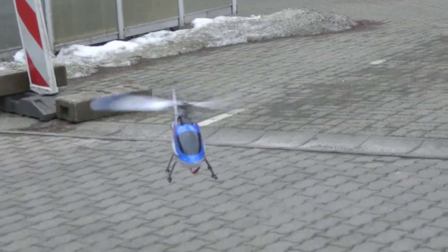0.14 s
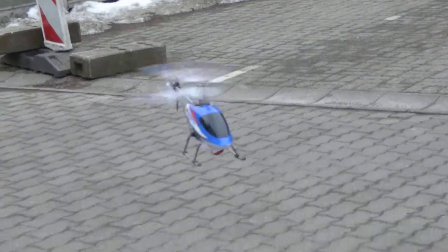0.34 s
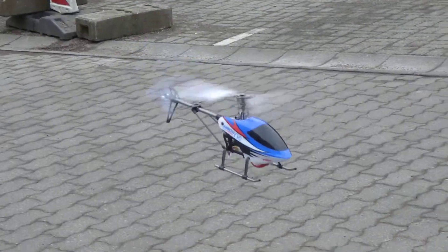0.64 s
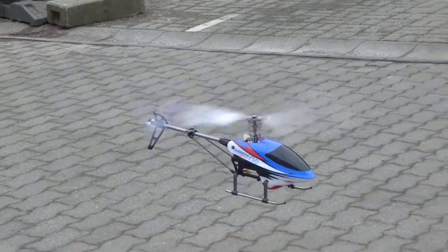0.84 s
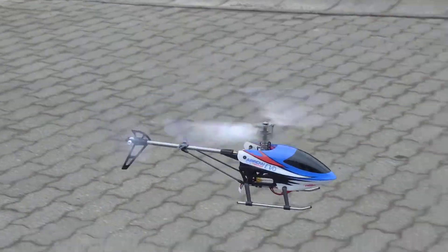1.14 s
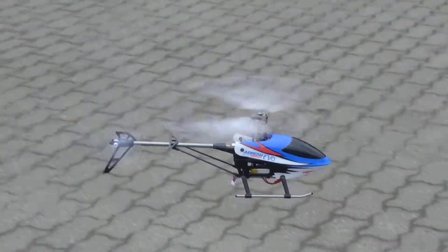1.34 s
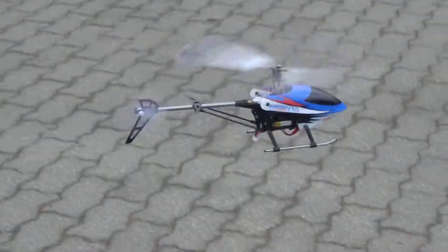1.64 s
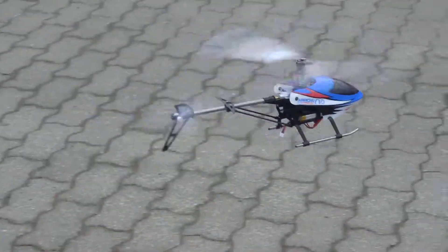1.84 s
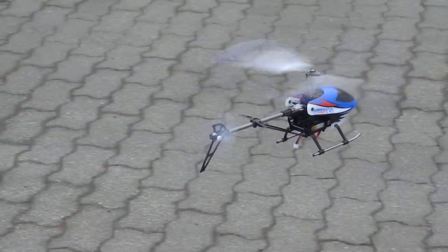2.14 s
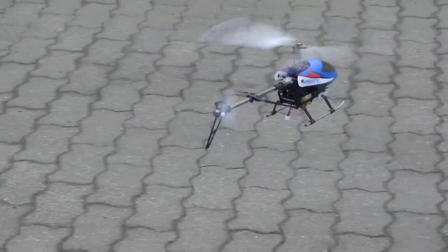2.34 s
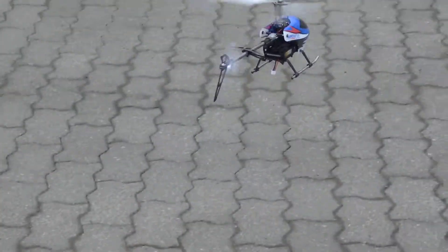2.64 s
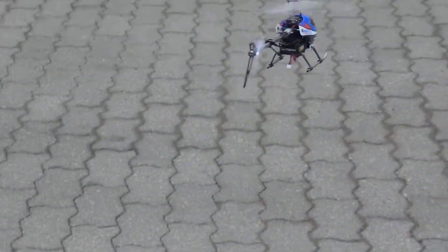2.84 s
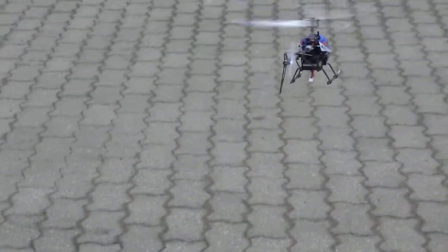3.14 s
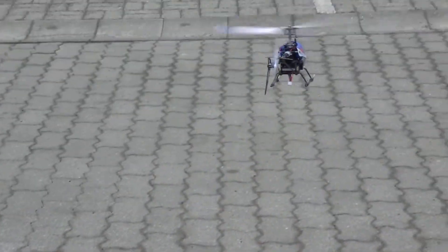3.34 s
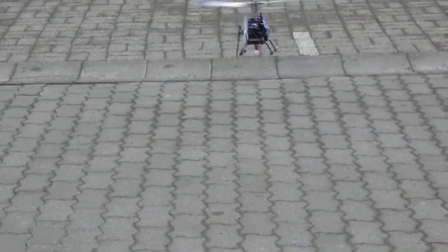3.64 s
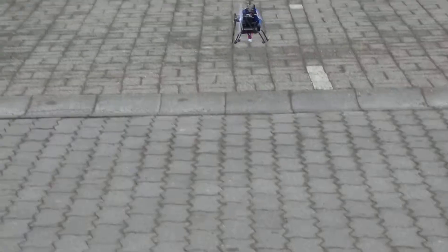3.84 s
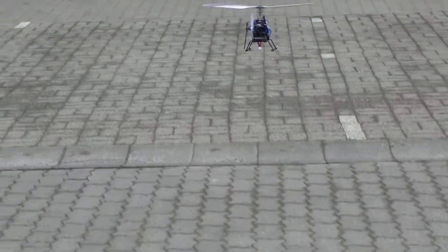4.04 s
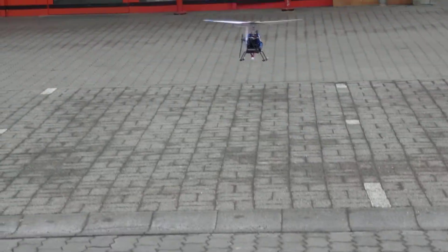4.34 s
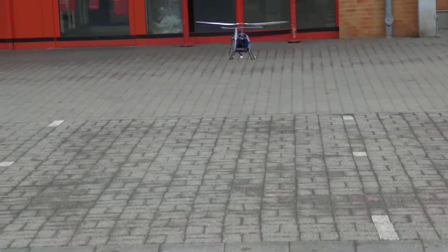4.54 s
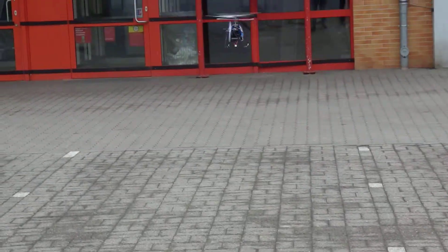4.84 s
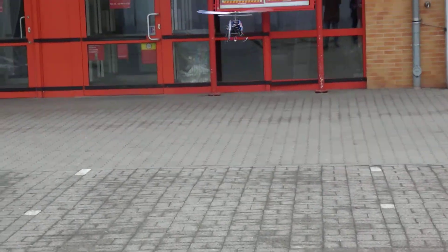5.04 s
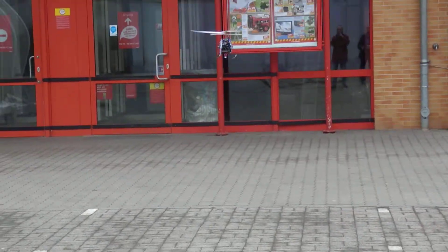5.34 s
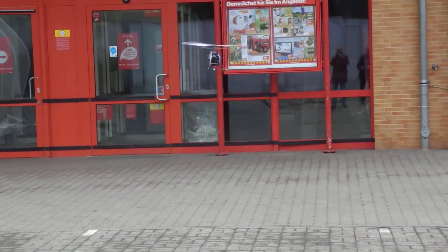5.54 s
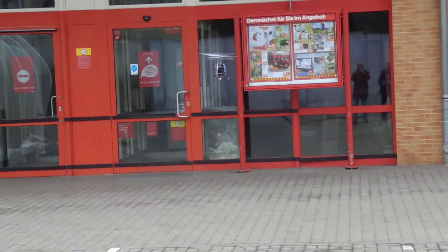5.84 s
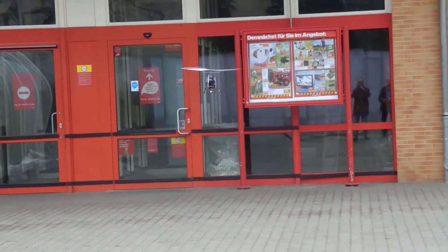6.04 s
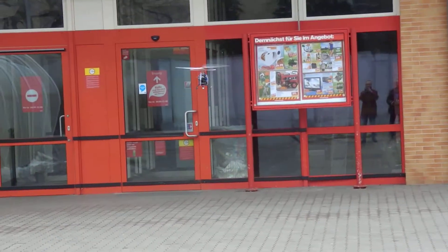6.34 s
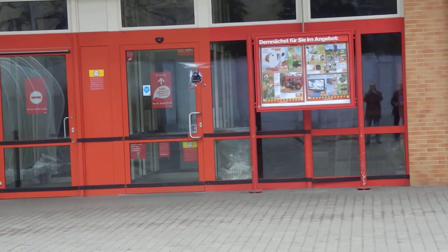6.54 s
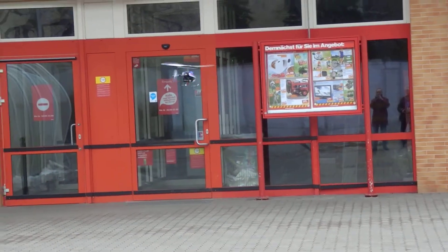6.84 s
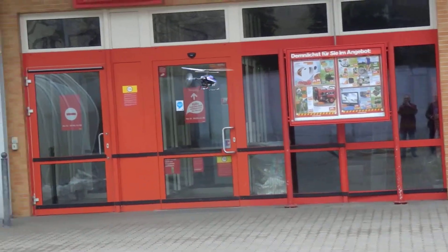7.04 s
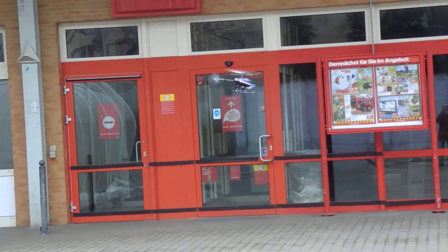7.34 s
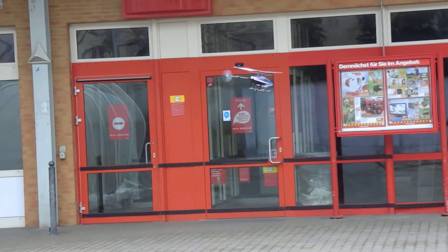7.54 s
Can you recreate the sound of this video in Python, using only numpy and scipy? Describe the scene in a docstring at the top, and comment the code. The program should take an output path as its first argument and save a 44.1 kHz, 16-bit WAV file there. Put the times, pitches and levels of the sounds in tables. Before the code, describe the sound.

A small electric model helicopter is heard from the start, a few metres away: a dense, nasal motor whine in the low thousands of hertz, crisp gear rattle above it and a rapidly fluttering airy swish. From 0 to 1.8 s it comes nearer, growing brighter and louder, the pitch creeping upward while the tail motor wavers and warbles. The close pass is at about 1.8 to 2.4 s, harsh and detailed. From 2.5 s it moves away; a short soft low puff of air brushes the microphone near 3.4 s. By 4 s rattle and swish are fading. Around 4.8 to 5.3 s the motor sags slightly in pitch, with a wall echo, and recovers by about 5.8 s. Until 7.7 s it stays a thin, distant whine in open yard reverberation, over muffled town traffic that rises slightly, with a faint low car engine hum strongest near 6.3 s.

```python
"""Model helicopter in a car park

A small electric model helicopter hovers past in a paved car park and flies off towards a shop front.
Gear-mesh partials and filtered chatter make the main motor's whine and rattle; the tail motor is a
stack of partials that hunts up and down in pitch, and the blades swish as beating coloured noise.
The paving combs the noise, the shop wall echoes the motors, and downwash puffs at the microphone.
Behind lies distant town noise, with one car whose partials follow a changing firing rate.
"""
import sys
import numpy as np
from scipy import signal
from scipy.fft import rfft, irfft, next_fast_len
from scipy.io import wavfile

SR = 44100
rng = np.random.default_rng(int(sys.argv[2]) if len(sys.argv) > 2 else 0)


def transcribe(signal):
    """Save signal, clipped to [-1, 1], as a 16-bit WAV file at the path in sys.argv[1]."""
    frames = np.atleast_2d(signal).T
    limited = np.clip(frames, -1, 1)
    pcm = np.round(limited * 32767).astype(np.int16)
    wavfile.write(sys.argv[1], SR, pcm)


N = 339129
TIME = np.arange(N) / SR  # seconds
SOUND_SPEED = 343  # metres a second
TEETH, GEAR_RATIO = 8, 8.25  # pinion teeth; shaft turns to one turn of the main rotor

# Path of the helicopter. Each row: time in seconds, distance in metres, height in metres,
# side shown to the listener (0 nose, 1 flank, 2 tail).
FLIGHT = [(0, 4.27, 1.21, 0.16), (.9, 2.49, 0.59, 0.04), (1.8, 1.86, 0.26, 0.79), (2.4, 1.98, 0.24, 1.1),
          (3, 2.9, .38, 0.88), (4, 4.92, 0.8, 1.4), (4.8, 7.9, 1.44, 1.58), (5.6, 10, 1.83, 1.76),
          (6.6, 10.6, 1.66, 1.8), (7.69, 8.5, 1.48, 1.44)]


def amp(db):
    """Level to amplitude: twenty decibels are a factor of ten."""
    return 10 ** (np.asarray(db) / 20)


def unit(x):
    """Normalization: scales a signal to rms 1."""
    return x / np.sqrt(np.mean(abs(x) ** 2) + 1e-20)


def curves(table):
    """Linear interpolation: the columns of a table as curves in time."""
    seconds, *columns = np.transpose(table)
    return [np.interp(TIME, seconds, column) for column in columns]


def colours(table, hz):
    """Spectral interpolation: the columns of a table as curves on a log-frequency axis."""
    table_hz, *columns = np.transpose(table)
    return [np.interp(np.log(hz + 1), np.log(table_hz + 1), column) for column in columns]


def shaped(x, gain):
    """Linear filtering: multiplies the spectrum of x by a function of frequency."""
    size = next_fast_len(N + 4096)
    spectrum = rfft(x, size) * gain(np.fft.rfftfreq(size, 1 / SR))
    return irfft(spectrum, size)[..., :N]


def noise(table, column=0):
    """Coloured noise: white noise filtered by one column of a table, at rms 1."""
    return unit(shaped(rng.standard_normal(N), lambda hz: amp(colours(table, hz)[column])))


def rumble(centre_hz, width_hz):
    """Narrow-band noise: random motion about one frequency, at rms 1."""
    def band(hz):
        return 1 / (1 + ((hz - centre_hz) / width_hz) ** 4)
    return unit(shaped(rng.standard_normal(N), band))


def drift(rate_hz):
    """Low-pass random process: slow chance of rms 1, mostly below the given rate."""
    size = 4096  # coarse points over the whole duration
    hz = np.fft.rfftfreq(size, N / SR / size)
    slow = irfft(rfft(rng.standard_normal(size)) / np.sqrt(1 + (hz / rate_hz) ** 4))
    return np.interp(TIME, np.linspace(0, N / SR, size), unit(slow))


def tone(turns, flutter, flutter_hz):
    """Random modulation: a partial of rms 1 whose strength and phase flutter."""
    wave = np.cos(2 * np.pi * (turns + rng.random()) + flutter * drift(flutter_hz))
    return unit(wave * np.exp(flutter * drift(flutter_hz)))


def delayed(x, seconds):
    """Propagation delay: x heard late, with a pitch shift wherever the delay changes."""
    return np.interp(TIME - seconds, TIME, x)


def spread(common, apart, width):
    """Sum and difference: two channels share one sound and carry another in opposite phase."""
    return np.array([common + width * apart, common - width * apart]) / np.sqrt(1 + width ** 2)


def facing():
    """Source directivity: the shares of nose, flank and tail turned to the listener."""
    side = np.clip(curves(FLIGHT)[2], 0, 2)
    return np.array([np.maximum(1 - abs(side - k), 0) for k in np.arange(3)])


def town(rumble_hz=55, rumble_width_hz=22, wide_hz=2500):
    """Incoherent summation: far traffic wash, a swelling rumble and a car's harmonic firing tones."""
    # Each row: time in seconds, level of the wash in dB.
    wash_level = [(0, -42), (2, -41), (4, -38.5), (5.5, -38), (6.3, -34.5), (7, -35.5), (7.69, -36)]
    # Colour of the wash. Each row: frequency in Hz, gain in dB.
    wash_colour = [(15, -22), (30, -18), (55, -3), (85, -7.5), (130, -0.5), (180, -4.5), (250, 4),
                   (340, -1.5), (450, 1), (700, 1.5), (1200, -4), (2500, -14.5), (6000, -48), (16000, -75)]
    # Distant car. Each row: time in seconds, firing rate in Hz, level in dB.
    car_course = [(0, 90, -54), (1.8, 84.1, -55), (3, 96, -50.5), (3.7, 81, -49.5), (4.8, 84, -47),
                  (5.9, 110.8, -51), (6.25, 122, -43.5), (6.8, 129.8, -48), (7.69, 97.2, -51)]
    # Each row: multiple of the firing rate, gain in dB.
    car_partials = [(1, -2.5), (2, -9), (3, -15)]
    # Each row: time in seconds, level of the rumble in dB.
    rumble_level = [(0, -59), (1.5, -58), (3, -53), (4.5, -53), (6.3, -59), (7.69, -57)]

    apart = shaped(noise(wash_colour), lambda hz: hz / (hz + wide_hz))  # nearly mono in the bass
    wash_db = curves(wash_level)[0] + .5 * drift(5)
    wash = amp(wash_db) * (noise(wash_colour) + np.array([apart, -apart]))
    firing_hz, car_db = curves(car_course)
    turns = np.cumsum(firing_hz) / SR
    partials = [amp(db) * tone(k * turns, flutter=0.27, flutter_hz=3.4) for k, db in car_partials]
    car = amp(car_db) * sum(partials)
    return wash + car + amp(curves(rumble_level)[0]) * rumble(rumble_hz, rumble_width_hz)


def downwash(centre_hz=45, width_hz=18):
    """Wind-induced pressure: moving air puffs at the microphone as short bursts of low noise."""
    # Each row: centre in seconds, peak gain in dB, time from the peak to 1/e in seconds.
    puffs = [(2.52, -50, .09), (3.445, -41, 0.0518)]
    envelope = sum(amp(db) * np.exp(-((TIME - s) / length) ** 2) for s, db, length in puffs)
    return rumble(centre_hz, width_hz) * envelope


def car_park(x, wall_db, yard_db, wall_m=18, t60=0.72):
    """Image source and diffuse decay: wall echo and yard scatter weigh more with distance."""
    # Beaming of the helicopter towards the wall. Each row: time in seconds, added echo gain in dB.
    beam = [(0, -6), (4.7, -5), (5.05, 5), (5.4, 5), (5.7, -2), (6.1, -10), (7.69, -10)]
    metres = curves(FLIGHT)[0]
    path = 2 * wall_m - metres  # shortens as the helicopter flies off, which raises the echo's pitch
    late = (path - metres) / SOUND_SPEED
    echo = amp(wall_db + curves(beam)[0]) * metres / path * delayed(x, late)

    t = TIME[:SR]
    sparse = (rng.random((2, SR)) < .05) * (t > .01)
    taps = rng.standard_normal((2, SR)) * sparse
    taps *= np.exp(-np.log(1000) * t / t60)  # 60 dB down after t60 seconds
    taps /= np.linalg.norm(taps, axis=1, keepdims=True)
    sent = x * metres / metres.max()
    scatter = signal.fftconvolve(sent[None], taps, axes=1)[:, :N]
    return x + echo + amp(yard_db) * spread(*scatter, width=0.79)


def paving(x, reflect=0.38, rough_hz=4500, mic_height_m=1.608):
    """Comb filtering: a treble-poor ground bounce interferes, sweeping with distance and height."""
    metres, height, _ = curves(FLIGHT)
    bounce_path = np.sqrt(metres ** 2 + 4 * height * mic_height_m)
    lag = (bounce_path - metres) / SOUND_SPEED
    bounce = shaped(x.mean(0), lambda hz: 1 / (1 + (hz / rough_hz) ** 4))
    return x + reflect * delayed(bounce, lag)


def microphone_pair(x):
    """Interchannel difference: two ports hear the sound with unlike level and phase."""
    # Each row: frequency in Hz, left level minus right in dB.
    level_difference = [(60, 7), (300, -2.5), (800, -0.5), (1200, 1), (1800, 2), (2300, -1), (3000, -3),
                        (4500, 0.5), (5200, 6.5), (6100, 6), (7000, 5.5), (8500, -1.5), (15000, 1.5)]
    # Each row: frequency in Hz, phase by which left leads in radians.
    phase_lead = [(0, 0), (250, -0.2), (690, -0.55), (1030, 0.8), (2330, -0.32), (3700, 0.5), (4820, 0.87),
                  (5250, 0.53), (5940, 0.24), (7410, -0.75), (9560, -0.44), (13300, 0.0), (13800, -0.7),
                  (14600, 0.0), (15400, -0.1)]

    def ports(hz):
        """Half of the difference goes to each port, with opposite sign."""
        half_level = amp(colours(level_difference, hz)[0] / 2)
        half = half_level * np.exp(.5j * colours(phase_lead, hz)[0])
        return np.array([half, 1 / half])
    return shaped(x, ports)


def blade_swish(shaft, chop=0.19):
    """Aerodynamic noise: turbulence swells as each of two main blades comes round."""
    # Each row: time in seconds, level in dB.
    swish_level = [(0, -31.5), (.6, -30), (1.2, -30.5), (1.7, -30), (2.2, -30), (3, -33.5), (4, -33),
                   (5, -35), (6, -37.5), (7.69, -37.5)]
    # Colour of the torn air. Each row: frequency in Hz, gain in dB from nose or flank, from behind.
    swish_colour = [(100, -21, -15), (250, -16.5, -18), (450, -3, -7), (750, 1, -1), (1090, 1, -1),
                    (1660, -0.5, -4.5), (2290, 3.5, 3.5), (3260, -0.5, -7), (4000, -5.5, -5.5),
                    (9000, -26.5, -27.5)]
    beat = 1 + chop * np.cos(2 * np.pi * 2 * shaft / GEAR_RATIO)
    behind = facing()[2]
    air = np.sqrt(1 - behind) * noise(swish_colour)
    air += np.sqrt(behind) * noise(swish_colour, column=1)
    return amp(curves(swish_level)[0]) * beat * air


def tail_rotor(tail_db=-2.5, buzz_db=-11, buzz_hz=2030, buzz_width_hz=170):
    """Frequency modulation: the gyro's hunting, drawn by chance, warbles the partials; a buzz rings the boom."""
    # Tail motor, which swings as the helicopter turns and dips with the main motor.
    # Each row: time in seconds, mean blade rate in Hz.
    blade_rate = [(0, 219), (.55, 219), (.71, 227), (.78, 211), (.85, 224), (1.15, 214), (1.3, 216),
                  (1.38, 206), (1.435, 232), (1.52, 201), (1.61, 225), (1.7, 219), (1.8, 231), (2, 227),
                  (2.06, 243), (2.18, 221), (2.25, 239), (2.45, 234), (3.45, 240), (3.75, 233), (4.07, 238),
                  (4.76, 229), (4.93, 202), (5.02, 217), (5.8, 235), (7.69, 236)]
    # Each row: multiple of the blade rate, gain in dB seen from nose, flank and tail.
    whine_partials = [(1, -23, -24.5, -27), (2, -17, -19, -20), (4, -15, -17, -16), (5, -17, -17.5, -18),
                      (7, -9.5, -20, -17), (8, -22, -9, -5.5), (9, 1, 1.5, -4.5), (10, -10, -18, -14),
                      (12, -33, -29, -31), (18, -28, -7.5, -19), (27, -18, -26, -22), (29, -11, -10, -13)]
    # Each row: time in seconds, level of whine and buzz in dB before tail_db is added.
    whine_level = [(0.0, -31.5), (0.58, -35), (0.92, -25.5), (1.14, -30.5), (1.28, -24), (1.76, -31.5),
                   (2.48, -26), (3.06, -33.5), (3.85, -29), (5.93, -37.5), (7.65, -36), (7.69, -35)]
    # Each row: time in seconds, level in dB of the hum at three times the blade rate.
    hum_level = [(0, -41), (1.2, -33.5), (1.5, -41), (2.3, -48.5), (3.3, -39), (4.5, -50), (7.69, -48)]

    sides = facing()
    # less random hunting is added while the nose shows, where blade_rate already carries the quick swings
    hunting_share = 1 - .5 * sides[0]
    hunting = .01 * hunting_share * rumble(centre_hz=7, width_hz=3)  # share of the blade rate
    turns = np.cumsum(curves(blade_rate)[0] * (1 + hunting)) / SR
    whine = np.zeros(N)
    for k, *db in whine_partials:
        whine += amp(db) @ sides * tone(k * turns, flutter=.14, flutter_hz=25)
    hum = tone(3 * turns, flutter=.2, flutter_hz=20)

    def boom(hz):
        return 1 / (1 + ((hz - buzz_hz) / buzz_width_hz) ** 8)
    buzz = unit(shaped(rng.standard_normal(N), boom))
    whine_gain = amp(curves(whine_level)[0] + tail_db)
    return whine_gain * (whine + amp(buzz_db) * buzz) + amp(curves(hum_level)[0]) * hum


def gear_level(nose_db=-17.5, flank_db=-14, tail_db=-15.5):
    """Directivity and inverse distance: gear gain, from levels at one metre before each layer's trim."""
    return amp([nose_db, flank_db, tail_db]) @ facing() / curves(FLIGHT)[0]


def gear_rattle(shaft, rattle_db=-1.0, per_turn=0.21, per_half_turn=0.21, per_rotor_turn=0.15, per_blade=0.1):
    """Impact excitation: loose teeth chatter in step with shaft and rotor, and ring the frame."""
    # Colour of the rattle in frame and canopy.
    # Each row: frequency in Hz, gain in dB seen from nose, flank and tail.
    frame_colour = [(500, -54, -38, -45), (1165, -5, -11.5, -24), (1800, -16, -21, -28.5),
                    (2010, -4.5, 0.5, -8), (2660, -19, -13, -37), (3120, -9, -10, -22), (3680, -9, -13, 2),
                    (4300, -1, -2, 5), (4880, 1.5, 2.5, 6), (5480, -4, -5.5, 5.5), (5740, -4, -0.5, 4),
                    (6800, -2.5, 0, 1.5), (7910, -7.5, -13, -3.5), (9300, -18, -19.5, -14),
                    (10450, -42, -25.5, -27), (12300.0, -34.0, -35, -33), (13400, -35, -22, -21),
                    (15400, -21, -21, -14)]
    turn, rotor = 2 * np.pi * shaft, 2 * np.pi * shaft / GEAR_RATIO
    load = per_turn * np.cos(turn) + per_half_turn * np.sin(2 * turn)
    load += per_rotor_turn * np.cos(rotor) + per_blade * np.sin(2 * rotor)
    chatter = rng.standard_normal(N) * np.exp(load)
    views = shaped(chatter, lambda hz: amp(colours(frame_colour, hz)))
    heard = sum(share * unit(view) for share, view in zip(facing(), views))
    return amp(rattle_db) * gear_level() * heard


def swelling(multiple):
    """Amplitude modulation: the gain of one motor tone through its brief swells."""
    # Each row: centre in seconds, multiple of the shaft rate, peak rise in dB,
    # time from the peak to 1/e of the rise in seconds.
    swells = [(1.4, 17, 4.5, 0.23), (3.1, 17, 3.5, .5), (3.9, 18, 4.5, .5), (7.0, 23, 9, .3),
              (7.5, 21, 4, .2)]
    rises = [db * np.exp(-((TIME - s) / length) ** 2)
             for s, k, db, length in swells if abs(k - multiple) < .5]
    return amp(sum(rises))


def motor_tones(shaft, wobble=0.0041, throb=0.31, treble_db=3, mesh_db=0, octave_db=0.5, sing_db=1):
    """Gear meshing: pinion teeth strike a main gear slightly out of round, once per rotor turn."""
    # Each row: time in seconds, level in dB of the tooth-mesh tone before mesh_db is added.
    mesh_level = [(0.0, -28.5), (0.38, -22.5), (1.24, -37), (1.37, -25.5), (1.58, -35), (1.8, -22.5),
                  (2.03, -26), (2.1, -32.5), (2.55, -31.5), (3.13, -20), (3.88, -25.5), (4.56, -39.5),
                  (5.95, -36.5), (6.08, -47), (6.66, -41), (7.69, -52)]
    # Octave of the mesh tone, which swells and fades during the close pass.
    # Each row: time in seconds, level in dB before octave_db is added.
    octave_level = [(0, -35), (.73, -28), (.85, -20.5), (1.02, -30), (1.21, -22.5), (1.34, -28.5),
                    (1.48, -20), (1.63, -25.5), (1.79, -17.5), (2.02, -27), (2.4, -21), (2.85, -31),
                    (3.6, -36), (4.35, -27.5), (4.9, -28.5), (5.3, -36), (5.65, -29), (7.4, -31.5),
                    (7.69, -38)]
    # Other motor tones. Each row: multiple of the shaft rate, gain in dB seen from nose, flank
    # and tail, before treble_db is added to the highest.
    partials = [(3, -30, -28, -25), (4, -27, -31, -24), (7, -15, -17, -12), (9, -18, -16, -12),
                (10, -19, -16, -13), (11, -24, -24, -22), (12, -17, -23, -18), (13, -30, -25, -32),
                (14, -25, -25, -16), (15, -15, -16, -24), (17, -7, -8, -17), (18, -11, -10, -17),
                (19, -19, -20, -12), (20, -19, -18, -15), (21, -14, -8, -12), (22, -10, -9, -18),
                (23, -20, -20, -11), (24, -17, -12, -17), (25, -21, -21, -19), (26, -22, -24, -22),
                (27, -22, -22, -25), (28, -22, -27, -25), (29, -26, -35, -35), (32, -22, -28, -23),
                (37, -45, -42, -38), (40, -46, -43, -43), (46.88, -37, -38, -35), (48, -40, -32, -31),
                (49.12, -44, -34, -35)]

    rotor = 2 * np.pi * shaft / GEAR_RATIO
    angle = shaft + wobble * np.sin(rotor)  # shaft turns
    mesh = tone(TEETH * angle, flutter=0.05, flutter_hz=30)
    octave = tone(2 * TEETH * angle, flutter=0.035, flutter_hz=30.2)
    out = amp(curves(mesh_level)[0] + mesh_db) * mesh
    out += amp(curves(octave_level)[0] + octave_db) * octave

    sides, level = facing(), amp(sing_db) * gear_level()
    # the tones throb a quarter cycle out of step
    swings = [level * (1 + throb * np.sin(rotor + k * np.pi / 2)) for k in np.arange(4)]
    for k, (multiple, *db) in enumerate(partials):
        shrill = multiple > 33
        gain = amp(np.array(db) + treble_db * shrill) @ sides
        partial = tone(multiple * angle, flutter=0.23, flutter_hz=3.9)
        out += gain * swelling(multiple) * swings[k % len(swings)] * partial
    return out


def scene():
    """Superposition: the helicopter in the car park, over the town."""
    # Main motor shaft, which speeds up for the pass and sags once on the way out.
    # Each row: time in seconds, turns a second in Hz.
    shaft_rate = [(0, 275.6), (.3, 276.2), (.66, 281.6), (1.15, 283.6), (1.9, 285), (2.3, 286.9),
                  (2.7, 286.2), (3.12, 287.3), (3.58, 284), (3.88, 282.7), (4.15, 282), (4.42, 278.8),
                  (4.76, 276.4), (5.02, 266.3), (5.23, 263.8), (5.55, 268.8), (5.74, 274.9), (6.2, 276.8),
                  (6.75, 277.1), (7.69, 275.8)]
    shaft = np.cumsum(curves(shaft_rate)[0]) / SR  # turns
    rattle = spread(gear_rattle(shaft), gear_rattle(shaft), width=0.097)
    # the swish differs between the channels mainly above the bass
    eddies = shaped(blade_swish(shaft), lambda hz: hz / (hz + 1500))
    swish = spread(blade_swish(shaft), eddies, width=0.48)
    motor = car_park(motor_tones(shaft), wall_db=2, yard_db=-9.0)
    tail = car_park(tail_rotor(), wall_db=-2.5, yard_db=-2)
    helicopter = paving(rattle + swish) + motor + tail
    return microphone_pair(helicopter) + town() + downwash()


def record(dry, cut_hz=15850):
    """Band limitation: a linear-phase low-pass filter removes the highest treble."""
    low_pass = signal.firwin(511, cut_hz, window=("kaiser", 9), fs=SR)
    return signal.oaconvolve(dry, low_pass[None], "same")


dry = scene()
out = record(dry)
transcribe(out)
```